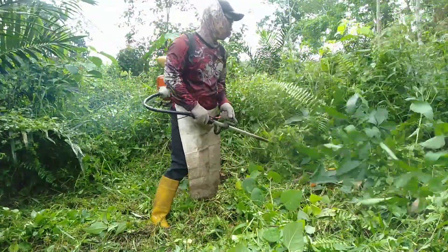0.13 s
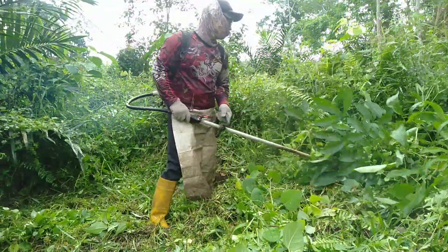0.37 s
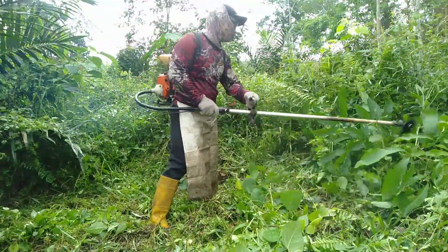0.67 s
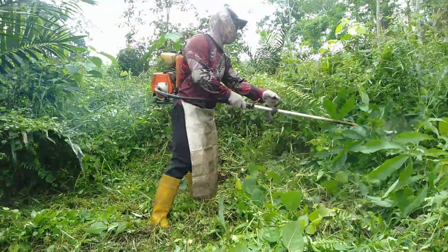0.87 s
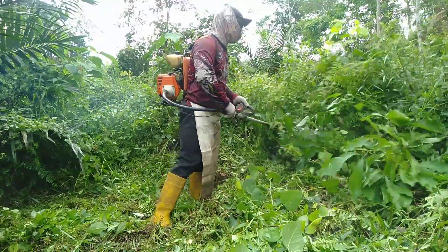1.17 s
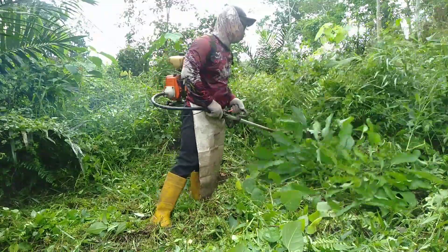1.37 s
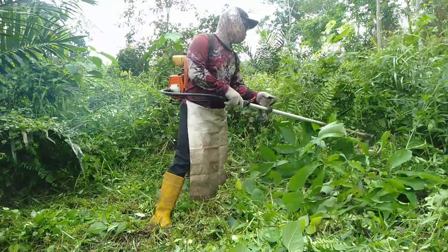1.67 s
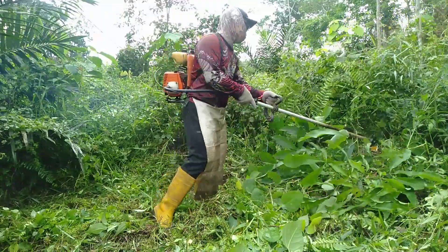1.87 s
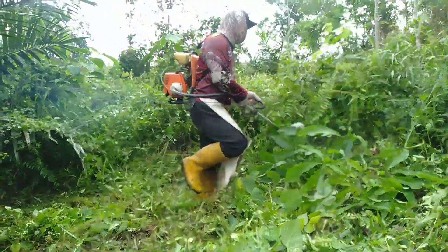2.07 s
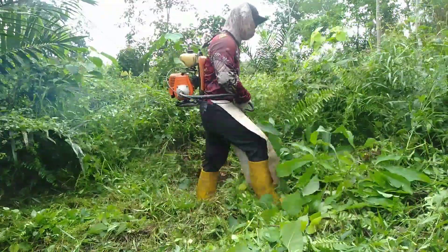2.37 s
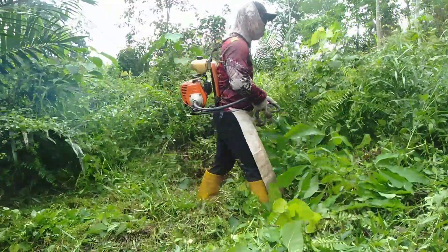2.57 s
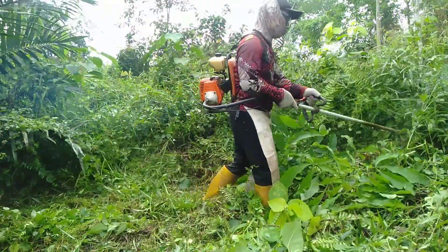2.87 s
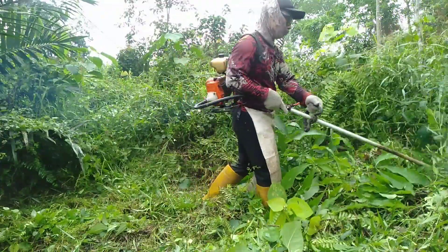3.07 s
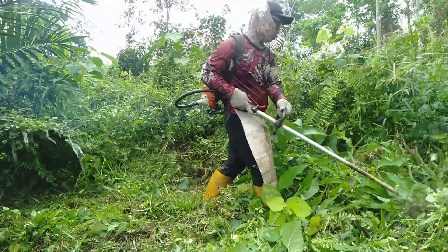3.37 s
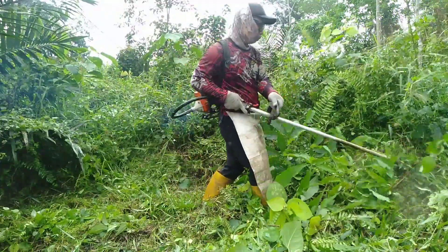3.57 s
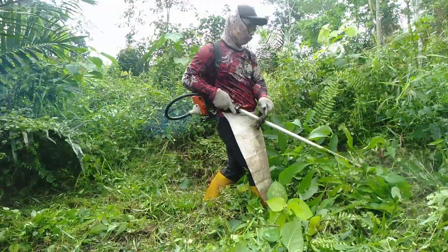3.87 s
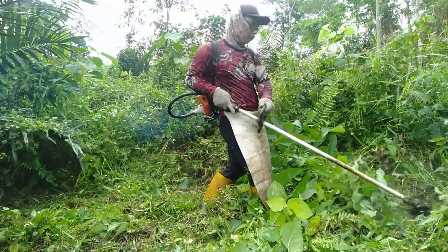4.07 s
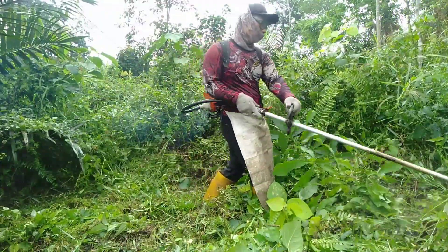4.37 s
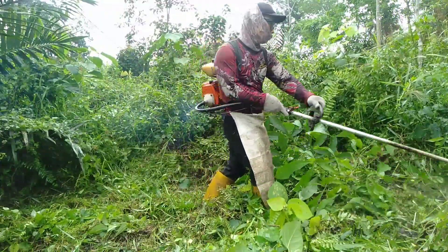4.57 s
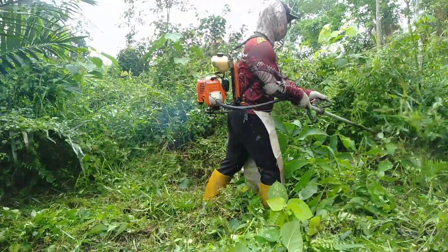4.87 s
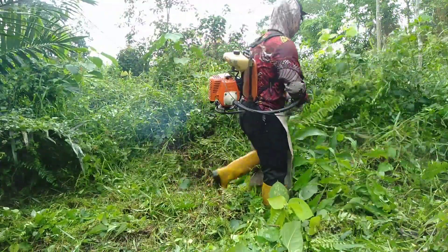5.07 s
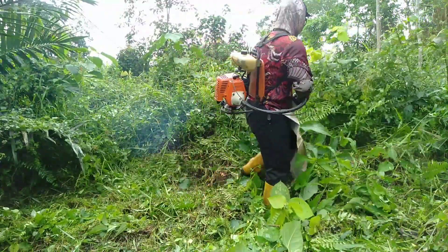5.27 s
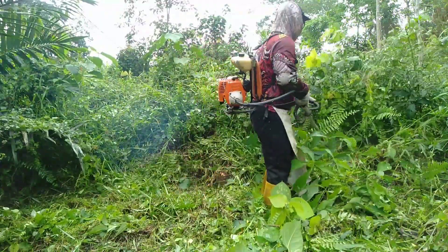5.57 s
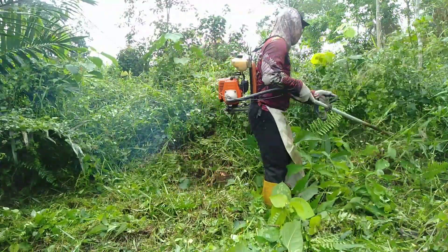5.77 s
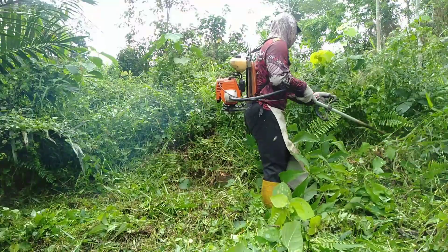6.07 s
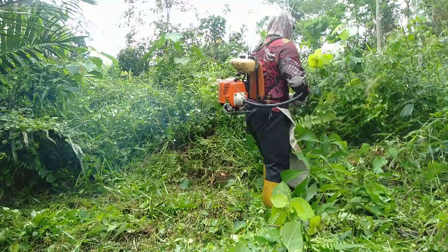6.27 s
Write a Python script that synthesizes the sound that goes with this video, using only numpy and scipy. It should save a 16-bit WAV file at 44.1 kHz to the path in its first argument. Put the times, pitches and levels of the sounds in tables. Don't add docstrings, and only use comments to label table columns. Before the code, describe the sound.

A petrol two-stroke brush cutter runs nonstop a few metres from a small microphone outdoors, close and dry. The engine revs up at the very start into a rough, rattling buzz with hollow exhaust, intake gulps and fan whine. Its pitch sags as the blade bites, notably near 0.4, 0.95 and 3.4 seconds, then wobbles back up. Leaves shred in gritty, bright hissing bursts, with twig snaps and woody knocks around 0.4 to 0.6 and 0.9 seconds. From 2 to 3 the motor is fuller, with cutting lighter between snaps. From 3.1 to 4.7 the shredding is heavy, with clustered snaps and stem clatter around 3.8 to 4.3; the exhaust thins and scraps thump the microphone from 4.3 to 4.7. After 5 the exhaust returns boomier, with moderate hissing cuts and a few snaps, the speed dropping at the end, still running. Sharp snaps make the level duck briefly.

```python
import sys
import numpy as np
from scipy import signal
from scipy.io import wavfile
from scipy.ndimage import uniform_filter1d

SR = 44100
rng = np.random.default_rng(int(sys.argv[2]) if len(sys.argv) > 2 else 0)


def transcribe(u):
    v = np.clip(np.atleast_2d(u).T, -1, 1)
    q = np.round(v * 32767).astype(np.int16)
    wavfile.write(sys.argv[1], SR, q)


def volts(x):
    e = np.asarray(x, float) / 20
    return 10 ** e


N = 283563
USUAL_DB = -33


def evened(x):
    return x / np.sqrt(np.mean(x ** 2) + 1e-20)


def curves(rows):
    s, *columns = np.transpose(rows)
    return [np.interp(np.arange(N) / SR, s, column) for column in columns]


def coloured(x, points):
    f, db = np.transpose(points)
    hz = abs(np.fft.fftfreq(4096, 1 / SR))
    level_db = np.interp(np.log(hz + 1), np.log(f), db, left=-70, right=-70)
    log_gain = np.log(volts(level_db))
    taps = np.fft.ifft(np.exp(np.conj(signal.hilbert(log_gain)))).real[:2048]
    return signal.oaconvolve(x, taps / np.linalg.norm(taps))[:len(x)]


def wander(hz):
    return evened(signal.lfilter(*signal.butter(2, hz, fs=SR), rng.standard_normal(N)))


def add(mix, s, sound):
    part = mix[round(s * SR):][:len(sound)]
    part += sound[:len(part)]


def ring(modes):
    t, out = np.arange(1500) / SR, np.zeros(1500)
    for hz, width, db, ms in modes:
        u = np.maximum(t - ms / 1000, 0)
        swell = np.pi * width * u * np.exp(-np.pi * width * u)
        out += volts(db) * swell * np.sin(2 * np.pi * hz * u)
    return out


def beats(turns, spread_db, modes):
    at = np.flatnonzero(np.diff(np.floor(turns)) > 0)
    late = (turns[at + 1] % 1) / (turns[at + 1] - turns[at])
    size = -volts(spread_db * rng.standard_normal(N)[at])
    train = np.zeros(N)
    train[at], train[at + 1] = late * size, (1 - late) * size
    return evened(signal.oaconvolve(train, ring(modes))[:N])


# t/s, f/Hz
THROTTLE = [(0.0, 81.8), (0.1, 92.5), (0.403, 99.6), (0.876, 107.4), (1.278, 93.3), (1.561, 99.0),
            (1.906, 105.3), (2.367, 98.7), (2.422, 100.5), (3.086, 104.6), (3.636, 92.6), (3.903, 98.0),
            (4.642, 100.4), (5.178, 95.4), (5.429, 101.2), (6.128, 106.8), (6.325, 97.1), (6.43, 78.4)]
# t/s, speed lost f/Hz, time to lose it t/s
BOGS = [(-0.032, 4.6, 0.031), (0.124, 2.5, 0.052), (0.271, 3.8, 0.06), (0.379, 12.2, 0.096),
        (0.936, 11.9, 0.036), (1.055, 5.6, 0.021), (1.507, 8.2, 0.114), (1.668, 1.7, 0.023),
        (1.955, 1.7, 0.023), (2.175, 6.9, 0.04), (2.528, 3.2, 0.171), (2.797, 1.0, 0.056),
        (3.206, 9.8, 0.106), (3.432, 13.0, 0.036), (3.622, 2.0, 0.04), (3.826, 6.9, 0.147),
        (3.999, 3.7, 0.061), (4.185, 4.2, 0.179), (4.516, 3.3, 0.095), (4.857, 6.0, 0.21),
        (4.977, 0.5, 0.056), (5.416, 2.3, 0.145), (5.6, 3.3, 0.12), (5.625, 3.6, 0.03), (5.76, 3.4, 0.101),
        (6.235, 2.8, 0.035)]
RECOVER_S = 0.4
CABLE_SHARE, CABLE_HZ, CABLE_S = 0.045, 10.0, 0.28


def speed():
    (hz,), t = curves(THROTTLE), np.arange(N) / SR
    for s, lost_hz, fall in BOGS:
        after = np.maximum(t - s - fall, 0)
        twist = CABLE_SHARE * (1 - np.cos(2 * np.pi * CABLE_HZ * after)) * np.exp(-after / CABLE_S)
        hz = hz - lost_hz * np.clip((t - s) / fall, 0, 1) * (np.exp(-after / RECOVER_S) - twist)
    flutter = wander(25.27)
    return hz * (1 + 0.004 * (flutter - uniform_filter1d(flutter, size=6000)))


# t/s, gain level/dB, half length t/s
SURGES = [(0.71, 1, 0.03), (1.052, 3.5, 0.036), (1.672, 2, .03), (2.1, 0.5, .05), (3.384, 4, 0.046),
          (3.617, 4.5, .03), (3.73, 4.5, 0.043), (4.673, 8, 0.036), (4.87, 3, 0.027), (5.677, 0.5, 0.064),
          (6.027, 1.5, 0.036)]


def surges():
    t = np.arange(N) / SR
    return sum(db * np.exp(-((t - s) / half) ** 2) for s, db, half in SURGES)


# t/s, muffler shell level/dB, exhaust outlet level/dB
FACING = [(0.03, -38.5, -38), (0.12, -30, -36.5), (0.47, -39, -43.5), (0.8, -31.5, -41), (1.08, -33, -33),
          (1.3, -36, -35), (1.41, -30, -36), (1.8, -35, -37), (1.88, -28.5, -36.5), (2.44, -27, -29),
          (3.11, -30.5, -36.5), (3.4, -35.5, -43), (3.55, -36, -44.5), (3.9, -35.5, -49),
          (4.15, -43.5, -62), (4.58, -41.5, -49), (5.1, -30.5, -27.5), (6.3, -30, -32)]


def facing():
    return np.array(curves(FACING)) + surges()


# f/Hz, width f/Hz, level/dB, delay t/ms
BARK = [(876.6, 199, 0, 0.48)]
BOOM = [(460.4, 188, 25, 1.4), (304, 56, -18.5, 2.46)]
CRACK = [(1183, 166, 1.5, 0.43), (2320, 94, -9, 1.633), (2650, 780, 5.5, 2.183), (4940, 450, -8.5, 2.3),
         (5220, 370, -12.5, 2.3)]
CRACK_DB, CRACK_SHARE, CRACK_SHELL_SHARE = -35, 1, 0.12
THROB_DB, THROB_SHARE = -39.5, 0.55
SECOND_DB, SECOND_DB_PER_HZ = -22, -2.5
USUAL_HZ, SLOWEST_HZ = 90, 86


def engine(turns, hz, shell_db, outlet_db):
    bark = volts(shell_db + 0.5) * beats(turns, 0.74, BARK)
    boom = volts(outlet_db - 1.5) * beats(turns, 1.0, BOOM)
    crack_db = CRACK_DB + CRACK_SHARE * (outlet_db - USUAL_DB) + CRACK_SHELL_SHARE * (shell_db - USUAL_DB)
    crack = volts(crack_db) * beats(turns, 1.2, CRACK)
    second = volts(SECOND_DB + SECOND_DB_PER_HZ * (np.maximum(hz, SLOWEST_HZ) - USUAL_HZ))
    throb = np.sqrt(2) * (np.sin(2 * np.pi * turns) - second * np.sin(4 * np.pi * turns - 0.3))
    throb_db = THROB_DB + THROB_SHARE * ((shell_db + outlet_db) / 2 - USUAL_DB)
    return bark + boom + crack + volts(throb_db) * throb


# t/s, fan whine level/dB, intake gulp relative level/dB
FAN = [(.04, -41, 3), (.12, -32.5, -2), (.32, -47, -1), (.72, -37, 1.5), (1.0, -50, -4), (1.3, -43, 3),
       (1.45, -29.5, 1.5), (1.7, -38, -2), (2.06, -40, 0), (2.2, -32.5, -2), (2.42, -34, 1.5),
       (3.1, -40, 2), (3.4, -33.5, 2.5), (3.55, -47, 6), (4.17, -40, -0.5), (4.64, -50, -2),
       (5.14, -37.5, -0.5), (6.0, -40, 3.5)]
# f/Hz, width f/Hz, level/dB, delay t/ms
GULP = [(572, 467, 8.5, 1.275), (1306, 400, 4.5, 1.23)]
GULP_DB, GULP_SHARE = -37, 0.36
PORT_GAP = 0.4
FAN_BLADES = 16


def breathing(turns, shell_db):
    fan_db, gulp_db = curves(FAN)
    gulps = beats(turns, 5.0, GULP) + 1.61 * beats(turns + PORT_GAP, 2.8, GULP)
    gulps_db = GULP_DB - 10.0 + gulp_db + GULP_SHARE * (shell_db - USUAL_DB)
    fan = volts(1.0 * wander(8)) * np.sin(2 * np.pi * FAN_BLADES * turns)
    return volts(fan_db - 3) * fan + volts(gulps_db) * gulps


# start t/s, length t/s, shredding level/dB, stem thrashing relative level/dB
BITES = [(0.0, 0.027, -27, -10.5), (0.083, 0.18, -33, -10), (0.279, 0.24, -26, -12.5),
         (.575, 0.019, -26, -13), (.65, 0.12, -34.5, -8.5), (0.823, 0.088, -27.5, -11.5),
         (0.903, 0.055, -24.5, -9), (0.954, 0.33, -31.5, -10), (1.466, 0.3, -29.5, -10.5),
         (1.882, 0.097, -29, -10.5), (2.014, 0.19, -30.5, -10), (2.13, 0.14, -30.5, -13),
         (2.283, 0.092, -40.5, -18), (2.531, 0.053, -28.5, -7.5), (2.584, 0.19, -32.5, -9.5),
         (2.8, 0.29, -30.5, -15), (3.104, 0.369, -25.5, -12), (3.516, 0.15, -28, -12),
         (3.708, 0.19, -26.5, -12.5), (3.915, 0.11, -27.5, -9), (4.06, 0.171, -26, -16),
         (4.261, 0.11, -24, -8.5), (4.385, 0.08, -23.5, -15.5), (4.51, 0.073, -26.5, -18),
         (4.62, 0.087, -29, -13.5), (4.766, 0.33, -33.5, -14.5), (5.455, 0.044, -28.5, -6.5),
         (5.523, .31, -30.5, -13), (5.85, 0.19, -31, -13), (6.087, .35, -31.5, -11)]
BITE_S, SWELL_SHARE, LET_GO_S = 0.027, 0.16, 0.0067
BRUSH_DB, BRUSH_THRASH_DB = -35, -9


def bites():
    t = np.arange(N) / SR
    shred = volts(BRUSH_DB) ** 2 * np.ones(N)
    thrash = shred * volts(BRUSH_THRASH_DB) ** 2
    for s, length, db, thrash_db in BITES:
        rise = np.clip((t - s) / (BITE_S + SWELL_SHARE * length) + 0.5, 0, 1)
        release = np.exp(-np.maximum(t - s - length, 0) / LET_GO_S)
        power = volts(db) ** 2 * rise * release
        shred = shred + power
        thrash = thrash + volts(thrash_db) ** 2 * power
    return np.sqrt(shred), np.sqrt(thrash)


# t/s, peak level/dB, body relative level/dB
SNAPS = [(0.413, -12, -4), (0.5078, -14.5, -6.5), (0.572, -16, -16), (0.699, -22, -16.5),
         (0.7728, -16.5, -26), (0.927, -9, -9), (1.092, -15.5, -4), (1.673, -18, -2), (1.7742, -11.5, -13),
         (2.156, -17, 1.5), (2.5626, -9.5, -7), (2.9592, -16.5, -7), (3.1103, -11.5, -5.5),
         (3.152, -12.5, -19), (3.2246, -14, -17), (3.435, -21, -1), (3.5384, -10.5, -17), (3.6656, -17, -2),
         (3.747, -16, -11), (3.7816, -13.5, -7.5), (4.0583, -14.5, -8), (4.091, -15.5, -19),
         (4.1856, -11.5, -6), (4.267, -19, -7), (4.5261, -12.5, -5.5), (4.692, -15, -11), (4.7544, -18, -7),
         (5.47, -11, -23), (5.811, -13.5, -23), (6.2444, -17.5, -7)]
# f/Hz, level/dB (per Hz)
SHRED = [(4590, -31), (7800, -19.5), (8880, -10), (11600, -8.5), (12500, -8.5), (14800, 1.5), (15800, 6)]
# f/Hz, level/dB (per Hz)
RASP = [(3500, -25), (4800, -12), (5800, -3.5), (6800, 1), (7600, -6), (8500, -14.5), (10000, -33)]
# f/Hz, level/dB (per Hz)
THRASH = [(30, -16), (150, 0), (300, -20.5), (550, -1.5), (1000, -1), (1800, -0.5), (2400, 0.5),
          (3300, -2.5), (4300, -3.5), (5500, -8), (6500, -29)]


def blade(turns):
    shred, thrash = bites()
    edge_pass = np.cos(2 * np.pi * 1.45 * turns + 3.1 * wander(6.7))
    gusts = volts(1.7 * wander(33.3) + 1.64 * edge_pass)
    ticks = (rng.random(N) < 1500 / SR) * rng.choice([-1, 1], N)
    crackle = volts(1.03 * np.minimum(rng.exponential(1, N), 4)) * ticks
    grain = evened(gusts * (rng.standard_normal(N) + 0.81 * evened(crackle)))
    tear, body = shred * grain, thrash * grain
    t = np.arange(2000) / SR
    for s, db, body_db in SNAPS:
        snap = volts(db - 6.0) * rng.standard_normal(2000) * np.exp(-t / 0.01) * (1 - np.exp(-t / 0.00063))
        add(tear, s, snap)
        add(body, s, volts(body_db - 6.0) * snap)
    leaves = volts(-3.0) * coloured(tear, SHRED) + volts(-5.0) * coloured(tear, RASP)
    return leaves + volts(4.5) * coloured(body, THRASH)


# t/s, peak level/dB, pitch f/Hz, length t/s
CHOPS = [(0.42, -18, 2340, 0.025), (0.424, -29, 2050, 0.011), (0.571, -19.5, 1820, 0.011),
         (0.579, -16, 2110, 0.031), (0.924, -30, 1780, 0.017), (1.642, -23, 1540, 0.034),
         (1.664, -20.5, 4630, 0.016), (2.195, -29, 2260, 0.048), (2.637, -20.5, 1900, 0.018),
         (3.33, -25, 2300, 0.02), (3.82, -21.5, 3140, 0.045), (3.8464, -26, 2965, 0.033),
         (3.92, -19, 2120, 0.016), (3.943, -21, 2330, 0.025), (3.985, -25, 1570, 0.021),
         (3.998, -17, 2117, 0.017), (4.099, -18, 3020, 0.017), (4.193, -21.5, 4260, 0.019),
         (4.209, -19.5, 3100, 0.025), (4.261, -22.5, 2040, 0.016), (4.313, -21.5, 2320, 0.025),
         (4.331, -22, 2420, 0.032), (4.525, -33, 2990, 0.041)]
EDGE_GAP_S = 0.0063


def stems():
    out, t = np.zeros(N), np.arange(4000) / SR
    for s, db, hz, length in CHOPS:
        noise = rng.standard_normal(4000)
        strikes = 0.39 + np.exp(-(t % EDGE_GAP_S) / 0.0016)
        chatter = noise * abs(noise) * np.exp(-(t / length) ** 2) * strikes
        wood = ring([(hz, 380, 0, 0), (1.32 * hz, 600, -1.5, 0),
                     (1.97 * hz, 500, -11, 0), (0.74 * hz, 500, -2.5, 0)])
        sound = signal.oaconvolve(chatter, wood)[:4000]
        add(out, s, volts(db + 2.5) * sound / abs(sound).max())
    return out


# t/s, pressure step (full scale = 1), settling t/s
JOLTS = [(4.2898, 0.099, 0.015), (4.301, 0.0059, 0.027), (4.3393, -0.16, 0.029), (4.3461, 0.075, 0.026),
         (4.3524, 0.08, 0.029), (4.3683, 0.19, .016), (4.4043, 0.067, 0.071), (4.4911, -0.2, 0.02),
         (4.5834, 0.081, 0.04), (4.591, 0.013, 0.019), (4.614, -0.033, 0.097), (4.701, -0.014, 0.03),
         (4.74, -0.012, 0.032)]


def jolts():
    out, t = np.zeros(N), np.arange(SR // 2) / SR
    for s, size, settle in JOLTS:
        leak = 1.06 * np.exp(-t / settle) + 0.15 * np.exp(-t / 0.056)
        add(out, s - 0.0005, size * (1 - np.exp(-t / 0.000064)) * leak)
    return out


def scene():
    shell_db, outlet_db = facing()
    hz = speed()
    turns = np.cumsum(hz) / SR
    motor = engine(turns, hz, shell_db, outlet_db) + breathing(turns, shell_db)
    return (motor + blade(turns) + stems() + jolts())[None]


# t/s, depth level/dB
DIPS = [(0.23, 3), (0.422, 1.5), (0.541, 1.5), (.615, 0), (0.777, 5.5), (.94, 1.5), (1.68, 3.5),
        (1.777, -1), (1.961, 4.5), (2.569, 3), (3.0, 3), (3.2, 1), (3.53, 5.5), (4.352, 5.5), (4.499, 4),
        (4.73, 0), (4.791, -1.5), (5.814, 3.5), (6.081, 2)]


def limiter(x):
    dip_db, t = np.zeros(N), np.arange(SR // 2) / SR
    for s, db in DIPS:
        add(dip_db, s, db * np.exp(-t / 0.16))
    return x / volts(dip_db)


def low_pass(x):
    return signal.sosfilt(signal.butter(12, 16860, fs=SR, output="sos"), x)


def record(dry):
    coupled = signal.lfilter(*signal.butter(1, 3.0, "high", fs=SR), limiter(dry))
    band_limit = signal.firwin(511, 15770, window=("kaiser", 9), fs=SR)
    mix = signal.oaconvolve(coupled, band_limit[None], "same")
    return low_pass(mix)


dry = scene()
out = record(dry)
transcribe(out)
```